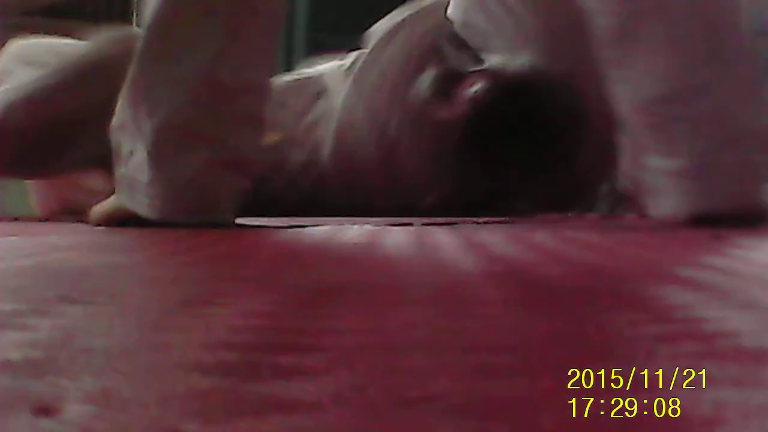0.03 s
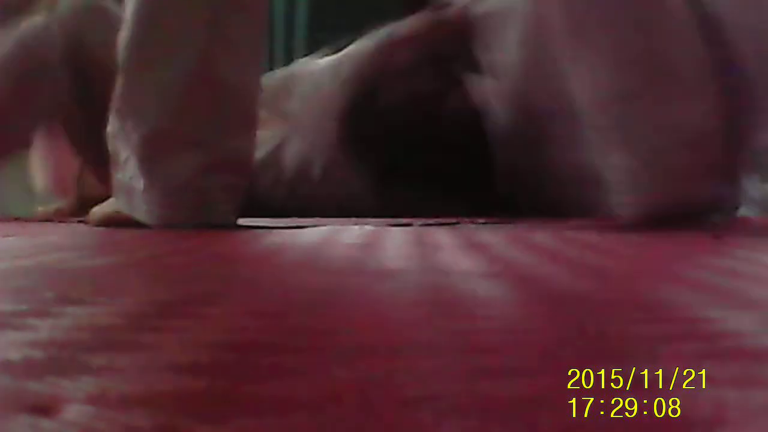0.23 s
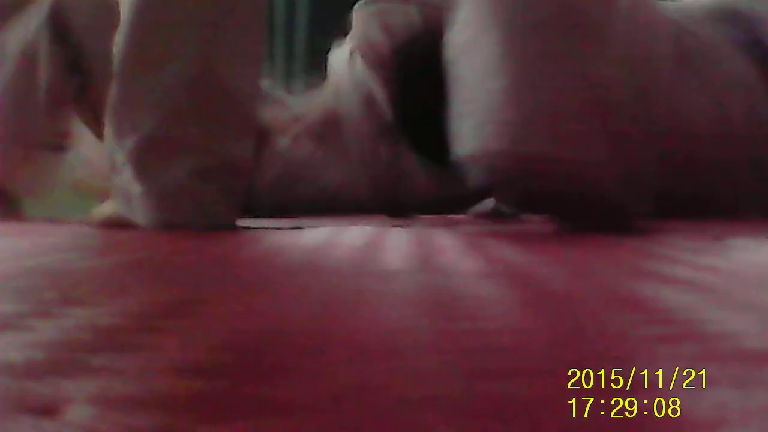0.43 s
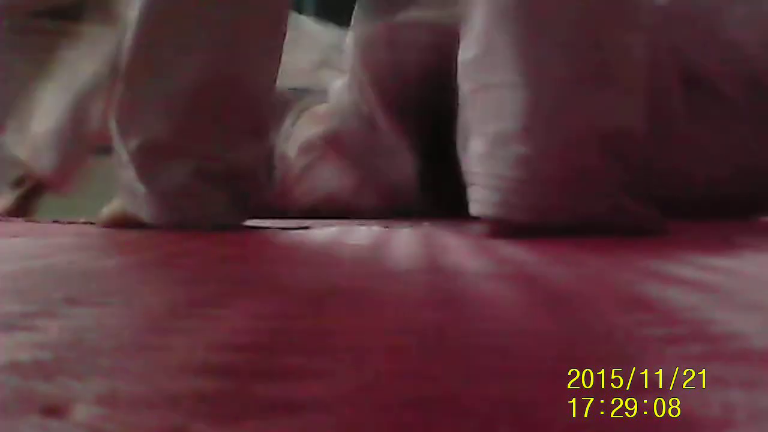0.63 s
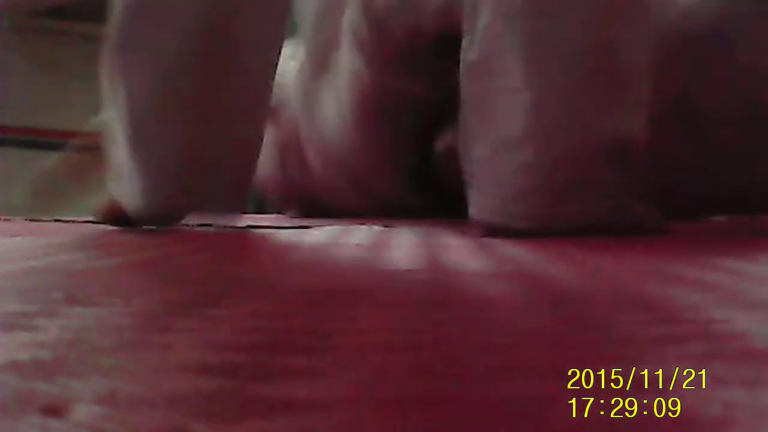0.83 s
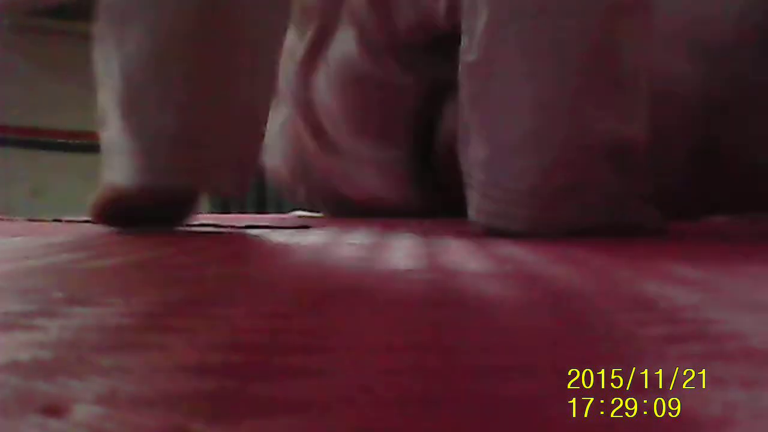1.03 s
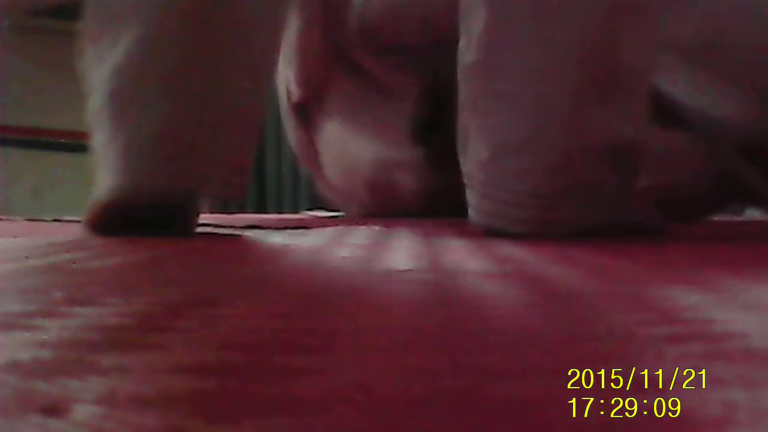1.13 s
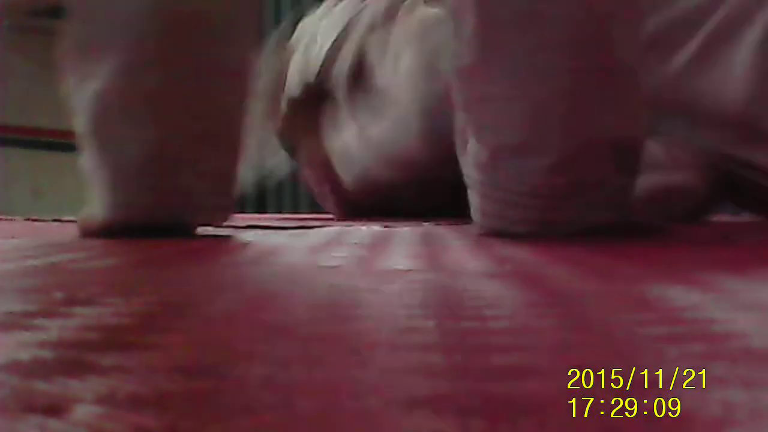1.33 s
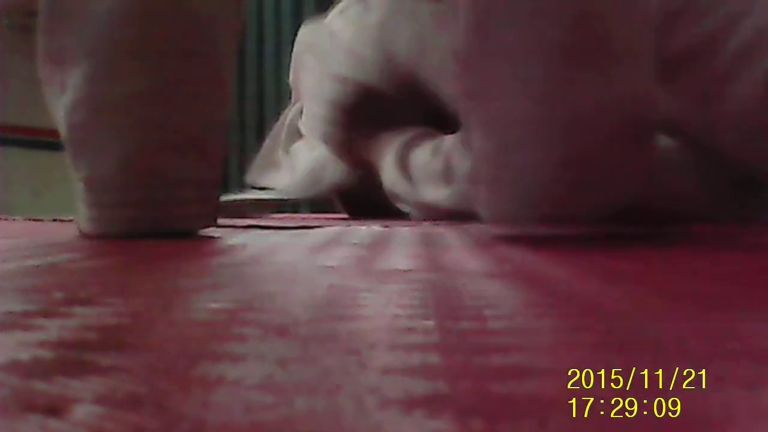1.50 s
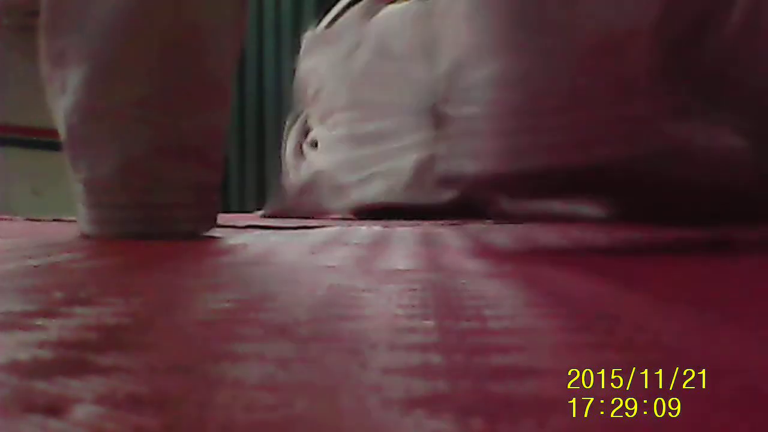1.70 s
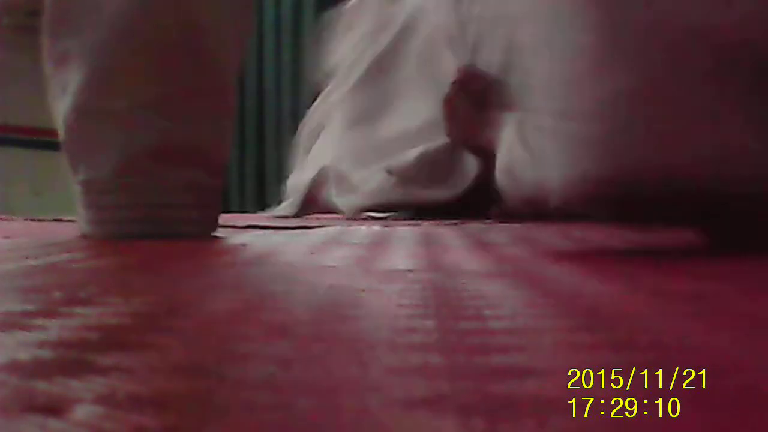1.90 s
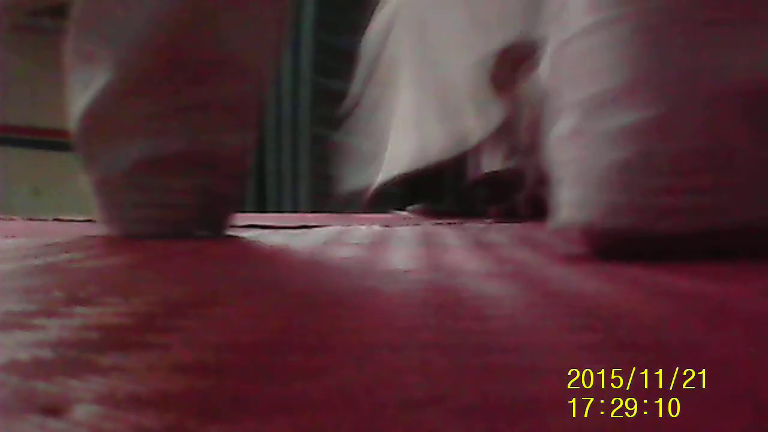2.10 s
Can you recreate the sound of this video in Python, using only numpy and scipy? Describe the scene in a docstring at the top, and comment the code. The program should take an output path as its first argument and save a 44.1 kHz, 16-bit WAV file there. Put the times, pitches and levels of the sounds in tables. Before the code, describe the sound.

One loud thud on a gym mat, followed by softer grappling thumps and jacket scuffles.

```python
"""Grapplers land on a padded mat in an echoing gym, close to a small microphone on the floor.
One heavy fall overloads the microphone; knees, hands and feet thump down after it.
Each landing is a slap on the cover and a boom of the padding; stiff jackets rustle and snap in between.
Rolling bodies rumble on the padding, and the steady air of the hall lies behind it all."""
import sys
import numpy as np
from scipy import signal
from scipy.fft import rfft, irfft
from scipy.io import wavfile
from scipy.ndimage import uniform_filter1d

SR = 44100
rng = np.random.default_rng(int(sys.argv[2]) if len(sys.argv) > 2 else 0)


def unload_audio(sound):
    """Save the sound as a 16-bit wav file, at the path given as the first command line argument."""
    columns = np.transpose(np.atleast_2d(sound))
    # keep every value between -1 and 1, then stretch to whole-number steps
    steps = np.round(np.clip(columns, -1, 1) * 32767)
    wavfile.write(sys.argv[1], SR, steps.astype(np.int16))


N = 94815
T = np.arange(N) / SR
HZ = np.fft.rfftfreq(N, 1 / SR)


def amp(db):
    """Decibels to gain."""
    return 10 ** (np.asarray(db) / 20)


def unit(x):
    """Scales to rms 1."""
    return x / np.sqrt(np.mean(x ** 2) + 1e-20)


def curve_at(points, hz):
    """Reads a table on a log-frequency axis."""
    freqs, values = np.transpose(points)
    return np.interp(np.log(hz + 1), np.log(freqs), values)


def add(mix, start_s, sound):
    """Mixes a sound in at a time."""
    part = mix[round(start_s * SR):][:len(sound)]
    part += sound[:len(part)]


def noise(colour, tilt_db=0):
    """Noise of rms 1 with a given spectrum, tilted per octave."""
    gain = amp(curve_at(colour, HZ) + tilt_db * np.log2(HZ + 20))
    return unit(irfft(rfft(rng.standard_normal(N)) * gain, N))


def ring(hz, t60, rise_s):
    """A softly struck mode."""
    return np.sin(2 * np.pi * hz * T) * (1 - np.exp(-T / rise_s)) * np.exp(-np.log(1000) * T / t60)


def burst(sound, envelope):
    """Shapes a noise and gives it the energy of its envelope."""
    shaped = sound * envelope
    return shaped / np.sqrt(np.sum(shaped ** 2) / np.sum(envelope ** 2))


def swell_at(peak_s, swell_s, fade_s):
    """A smooth hump that peaks at a time."""
    return np.exp(-((T - peak_s) / np.where(T < peak_s, swell_s, fade_s)) ** 2)


def hall_air(level_db=-45):
    """Room tone: the steady air of the gym."""
    # Each row: frequency in Hz, relative level of the air in dB.
    colour = [(25, -11), (60, -2), (130, -1), (220, -7), (380, -2), (900, -7.5), (1400, -11), (2000, -17.5),
              (3000, -25.5), (4200, -23), (5500, -32)]
    return amp(level_db) * noise(colour)


def jackets(grain_db=2):
    """Jackets sweep over the mat: grainy cloth friction swells and fades with each move."""
    # Each row: peak time in seconds, level in dB, swell and fade in seconds, tilt in dB per octave.
    sweeps = [(0.23, -25.5, 0.013, .01, 2), (0.781, -29.5, 0.025, 0.017, -1.5),
              (.86, -33, 0.016, 0.093, -1), (1.005, -38, 0.073, 0.068, 1), (1.5, -45, 0.034, 0.056, 3.5),
              (1.6, -46.5, 0.11, 0.21, 4.5), (1.878, -44.5, 0.032, 0.033, 1.5),
              (2.095, -80, 0.015, 0.044, 5)]
    # Each row: frequency in Hz, relative level of the rustle in dB.
    colour = [(60, -16), (200, 19.5), (600, 7), (1300, 6), (2200, -5), (3000, -14.5), (4200, -10),
              (5500, -18.5)]
    rustle = np.zeros(N)
    for peak, db, swell, fade, tilt_db in sweeps:
        rustle += amp(db) * swell_at(peak, swell, fade) * noise(colour, tilt_db)
    grain = unit(uniform_filter1d(rng.standard_normal(N), size=200))
    return rustle * unit(amp(grain_db * grain))


def thumps():
    """Weight sinks into the mat: padding and taut cover ring briefly, and the floor booms beneath."""
    # Each row: start in seconds, level in dB, padding pitch in Hz, its t60 in seconds,
    # floor boom in dB relative to the landing, boom pitch in Hz.
    landings = [(.229, -7, 249, 0.033, -17, 102), (0.234, 3.5, 280.6, 0.045, -14, 114),
                (0.2422, 9.5, 220.3, 0.13, -11, 123), (0.2829, -2, 205.5, 0.068, -8, 83),
                (0.374, -26, 165, .1, -2, 89), (0.786, -35.5, 172.3, 0.16, -5, 108),
                (0.801, -11, 166, 0.14, -6.5, 97.2), (0.8149, -6, 223.7, 0.067, 0.5, 104.1),
                (0.971, -23.5, 161, 0.09, 1, 97.3), (1.07, -32.5, 153, 0.22, -3.5, 90.7),
                (1.311, -20, 275, 0.02, 4.5, 91.2), (1.393, -30.5, 163.5, 0.23, 9, 95.2),
                (1.433, -26.5, 178, 0.077, -2.5, 107.3), (1.707, -26, 167.6, 0.095, 4, 118.2),
                (1.745, -23.5, 204.6, .08, 2, 107.5), (1.8351, -19, 192.5, .08, -17.5, 82),
                (1.875, -21.5, 174, 0.13, -4, 94.5), (1.953, -35, 152, 0.24, -5, 103)]
    # Each row: pitch in Hz, level in dB relative to the landing, t60 in seconds.
    cover_modes = [(298.2, -13, 0.075), (368, -17.5, 0.085), (544, -17, 0.087), (1036, -22, .09)]
    cover = sum(amp(db) * ring(hz, t60, rise_s=0.0013) for hz, db, t60 in cover_modes)
    out = np.zeros(N)
    for start, db, hz, t60, boom_db, boom_hz in landings:
        padding = ring(hz, t60, rise_s=0.0015)
        boom = amp(boom_db) * ring(boom_hz, t60=0.15, rise_s=0.0037)
        add(out, start, amp(db) * (padding + cover + boom))
    return out


def slaps(rise_s=0.002):
    """Skin and cloth strike the cover; each contact squeezes out a burst of noise."""
    # Each row: start in seconds, level in dB, decay in seconds, tilt in dB per octave.
    contacts = [(0.2334, 3, 0.019, -2.5), (.238, 7, 0.0027, -1), (.281, -3, 0.031, -4),
                (.802, -15.5, 0.036, -0.5), (.968, -24.5, 0.09, -0.5), (1.3005, -24, 0.018, 1.5),
                (1.313, -19.5, 0.023, -3.5), (1.704, -29.5, 0.043, -2), (1.826, -32, 0.038, -2)]
    # Each row: frequency in Hz, relative level of the slap in dB.
    colour = [(25, -20.5), (60, -28), (130, -0.5), (290, 2.5), (430, -11), (600, -7.5), (1100, -12),
              (2000, -22.5), (3000, -33.5), (5000, -39.5)]
    out = np.zeros(N)
    for start, db, decay, tilt_db in contacts:
        envelope = (1 - np.exp(-T / rise_s)) * np.exp(-T / decay)
        add(out, start, amp(db) * burst(noise(colour, tilt_db), envelope))
    return out


def snaps():
    """Cloth and skin stick to the cover and snap: very short bursts, in one band each."""
    # Each row: start in seconds, level in dB, band centre and width in Hz, decay in seconds.
    ticks = [(0.2658, -16.5, 4060, 250, 0.001), (0.2797, -22.5, 4000, 1223, 0.0012),
             (0.801, -29, 2000, 890, 0.0026), (.811, -35, 4770, 940, 0.0016),
             (.986, -29.5, 1333, 500, 0.011), (1.005, -41.5, 3670, 1460, 0.0029),
             (1.3002, -43, 1700, 1000, 0.0024), (1.712, -46.5, 4870, 1810, 0.002),
             (1.837, -45, 3470, 500, 0.002), (1.952, -43, 3460, 2440, 0.0014),
             (1.9601, -33, 1770, 820, 0.00076), (1.960, -44.5, 3820, 1180, 0.0017)]
    out = np.zeros(N)
    for start, db, centre, width, decay in ticks:
        resonance = 1 / (1 + (2 * (HZ - centre) / width) ** 2)
        band = unit(irfft(rfft(rng.standard_normal(N)) * resonance, N))
        envelope = (2 * T / decay) * np.exp(1 - 2 * T / decay)
        add(out, start, amp(db) * burst(band, envelope))
    return out


def hall_echo(sound, build_s=0.012):
    """The gym answers with a diffuse echo that builds up and dies away, the bass last."""
    # Each row: frequency in Hz, t60 of the hall in seconds.
    decay_times = [(60, 1.47), (110, 1.6), (200, 0.58), (420, 1.024), (1100, 1.04), (3000, 0.77),
                   (5000, 0.78)]
    # Each row: frequency in Hz, level of the echo in dB.
    colour = [(30, -1.5), (90, -2), (140, -3), (200, -10.5), (400, -0.5), (1000, -4.5), (2500, -5),
              (5000, -3)]
    hz, t, spectrum = signal.stft(rng.standard_normal(N), SR, nperseg=512)
    t60 = curve_at(decay_times, hz)[:, None]
    decay = np.exp(-np.log(1000) * t / t60)
    equal_energy = np.sqrt(2 * np.log(1000) / (t60 * SR))
    spectrum = spectrum * decay * equal_energy * amp(curve_at(colour, hz))[:, None]
    tail = signal.istft(spectrum, SR, nperseg=512)[1][:N]
    return signal.fftconvolve(sound, tail * (1 - np.exp(-T / build_s)))[:N]


def rolls():
    """A low rumble as the bodies roll their weight over the padding."""
    # Each row: peak time in seconds, level in dB, swell and fade in seconds.
    shifts = [(.86, -24, 0.043, 0.1), (1.02, -28, .06, 0.15), (1.44, -38, 0.08, 0.12),
              (1.77, -33, 0.036, 0.043), (1.95, -38, 0.057, 0.11)]
    # Each row: frequency in Hz, relative level of the rumble in dB.
    colour = [(25, -22.5), (55, -5), (95, 0), (160, -2.5), (230, -11), (400, -26), (1500, -51.5)]
    return noise(colour) * sum(amp(db) * swell_at(peak, swell, fade) for peak, db, swell, fade in shifts)


def scene(thump_send_db=-8.5, snap_send_db=-11):
    """Landings, cloth and rolling close by, with the hall around them, in mono."""
    thuds = thumps()
    surface = slaps() + jackets()
    ticks = snaps()
    echo = hall_echo(surface + amp(thump_send_db) * thuds + amp(snap_send_db) * ticks)
    return (thuds + surface + ticks + echo + hall_air() + rolls())[None]


def record(dry):
    """The small microphone on the floor: a presence peak, a narrow band, hard overload on the big fall."""
    presence_db, presence_hz, width_hz = 2, 4100, 1800
    mic_top_hz, overload_top_hz, band_limit_hz = 5140, 10200, 15800
    ceiling, dc_offset = 0.71, 0.009
    presence = amp(presence_db * np.exp(-((HZ - presence_hz) / width_hz) ** 2))
    x = irfft(rfft(dry) * presence, N)
    x = signal.sosfilt(signal.butter(16, mic_top_hz, fs=SR, output="sos"), x) + dc_offset
    x = x / (1 + (x / ceiling) ** 32) ** (1 / 32)  # peaks flatten at the ceiling
    x = signal.sosfilt(signal.butter(1, overload_top_hz, fs=SR, output="sos"), x)
    band_limit = signal.firwin(255, band_limit_hz, window=("kaiser", 9), fs=SR)
    return signal.oaconvolve(x, band_limit[None], "same")


dry = scene()
out = record(dry)
unload_audio(out)
```